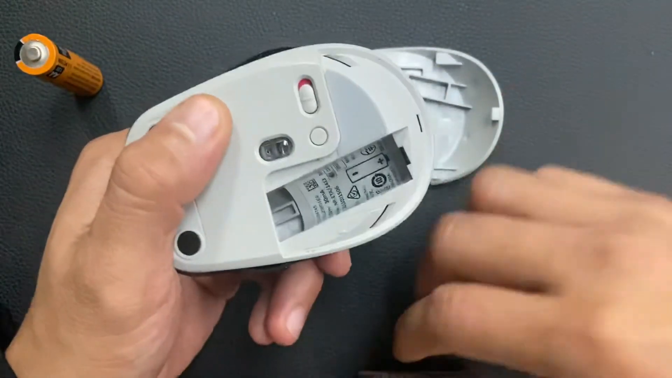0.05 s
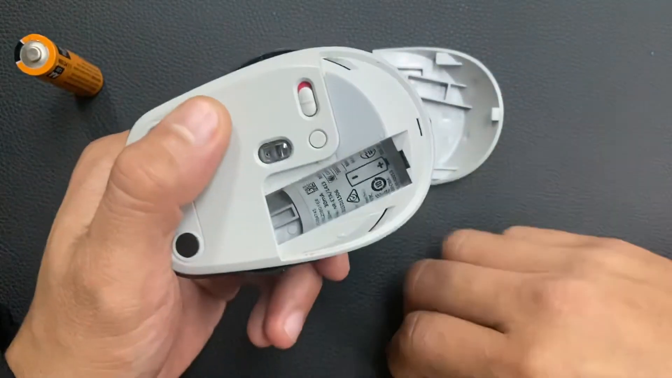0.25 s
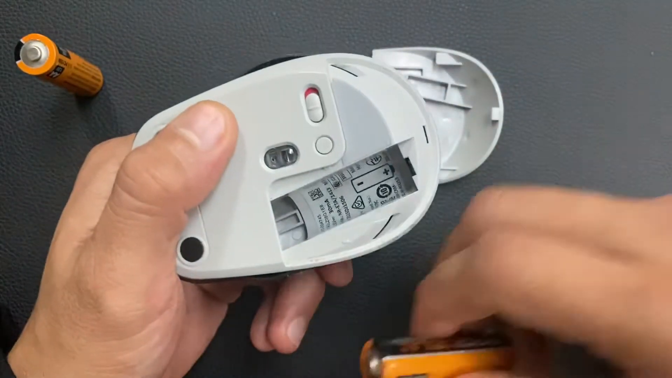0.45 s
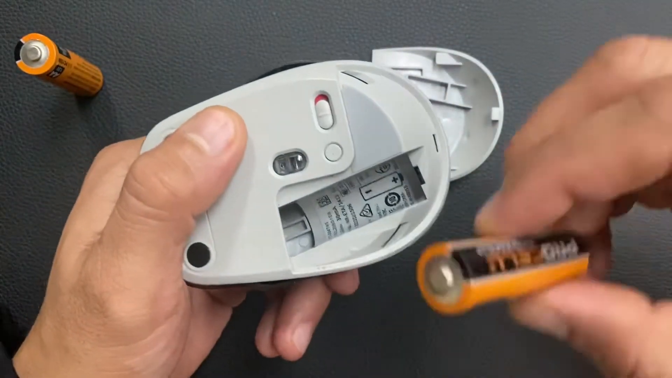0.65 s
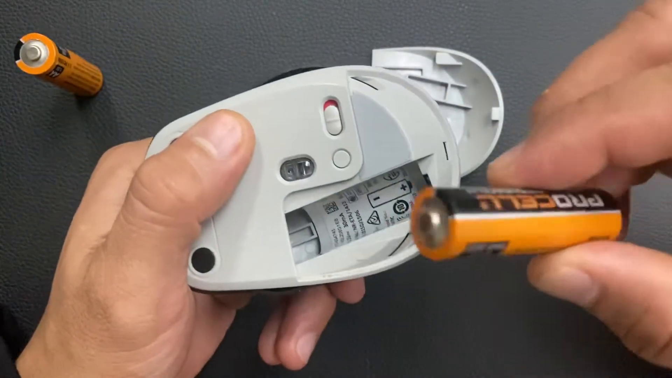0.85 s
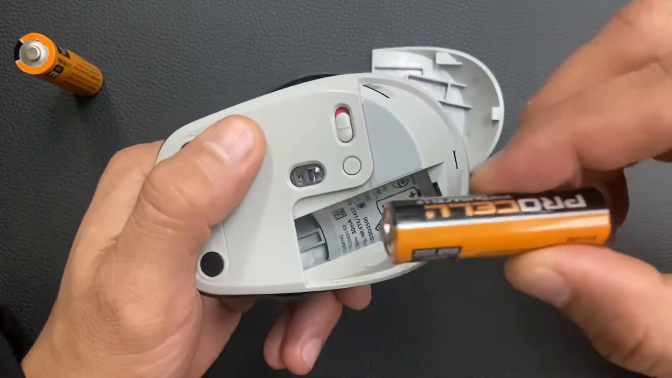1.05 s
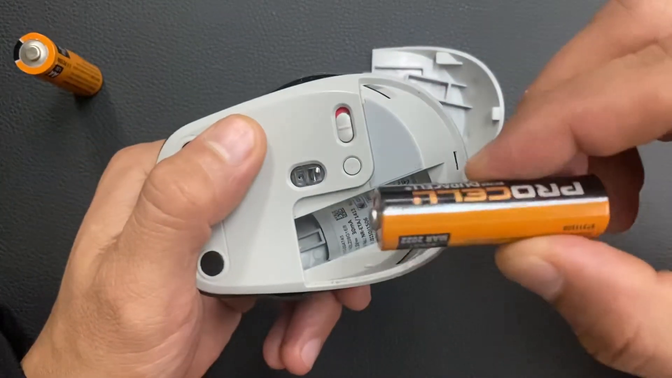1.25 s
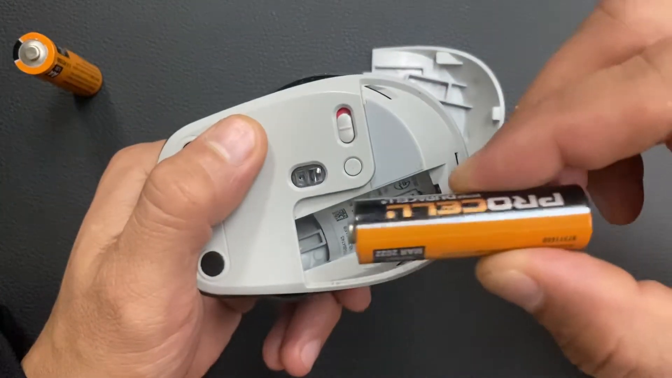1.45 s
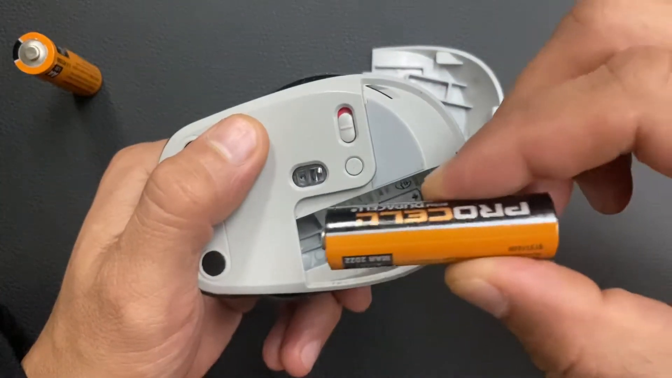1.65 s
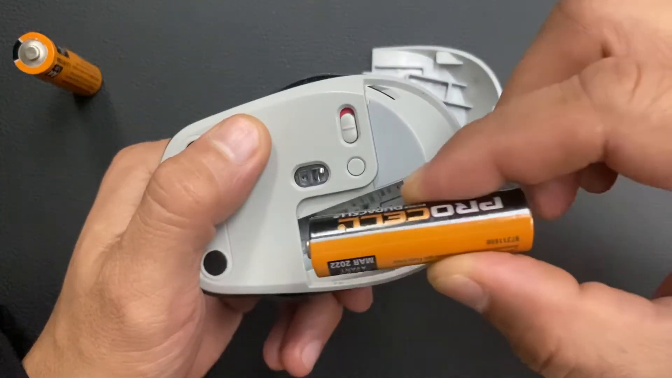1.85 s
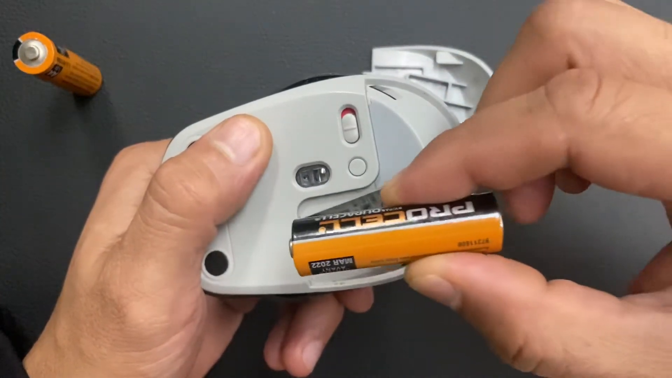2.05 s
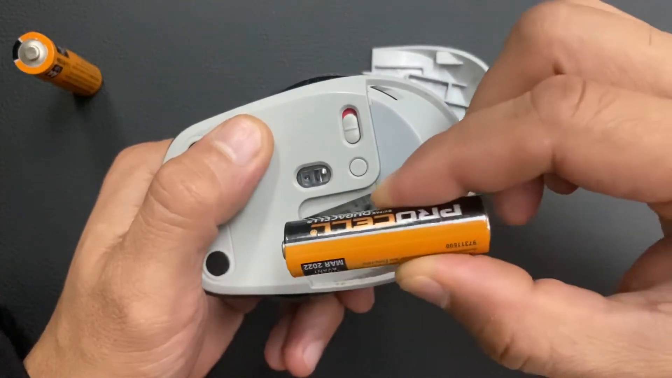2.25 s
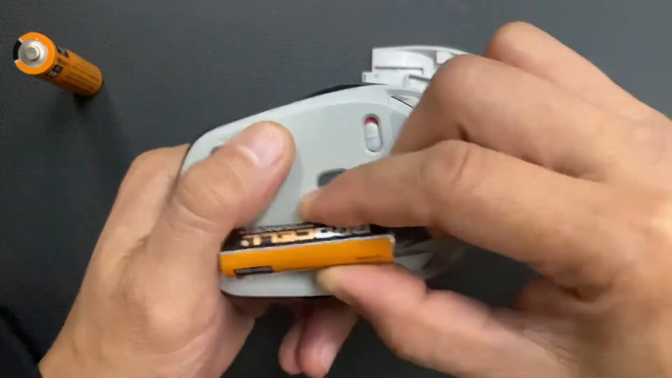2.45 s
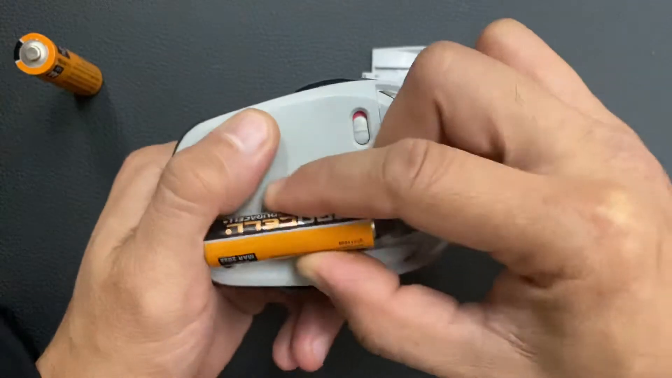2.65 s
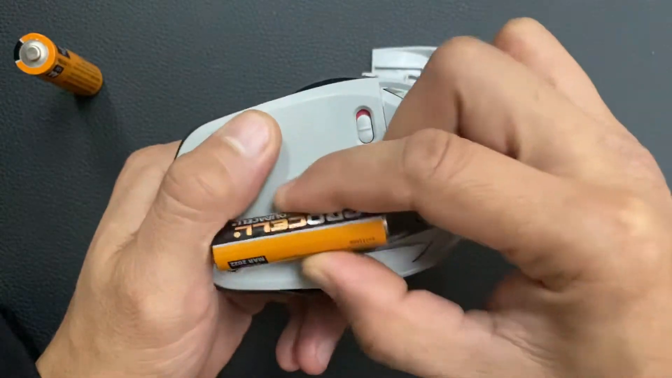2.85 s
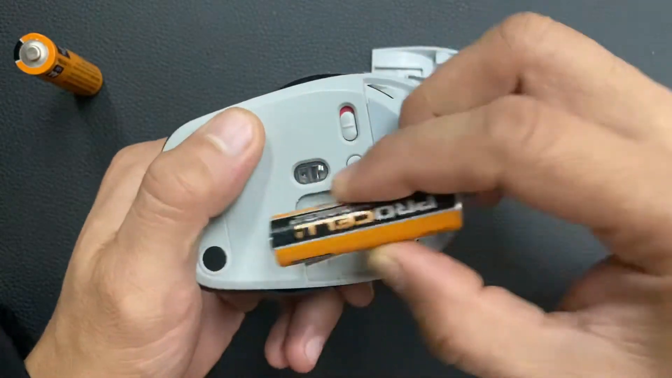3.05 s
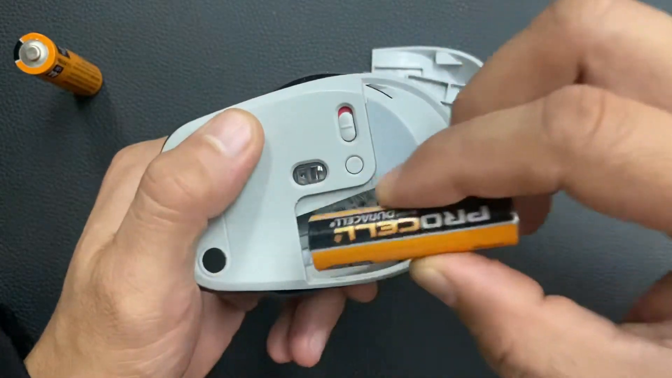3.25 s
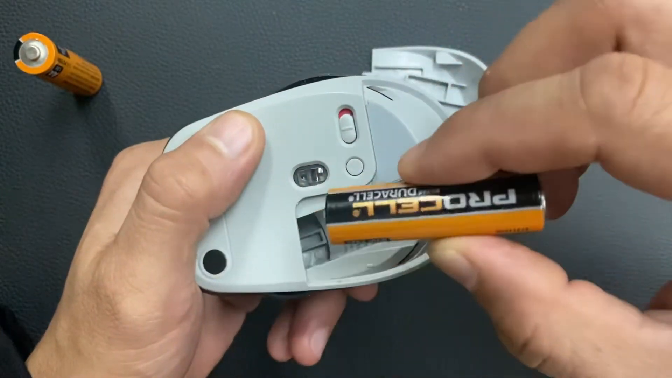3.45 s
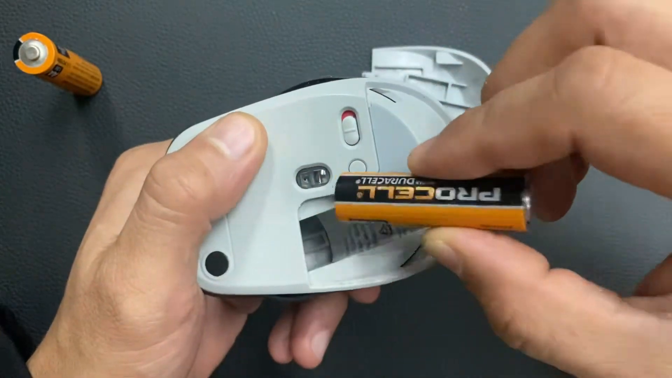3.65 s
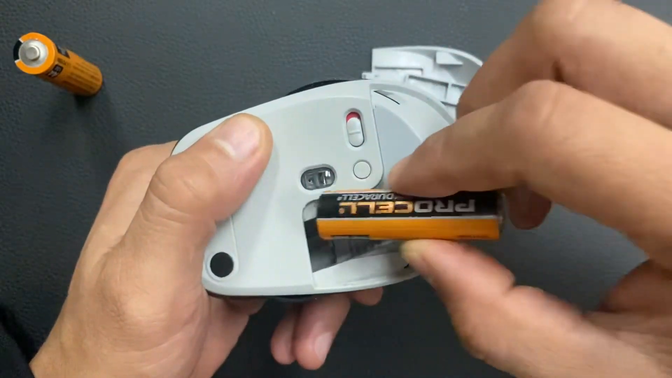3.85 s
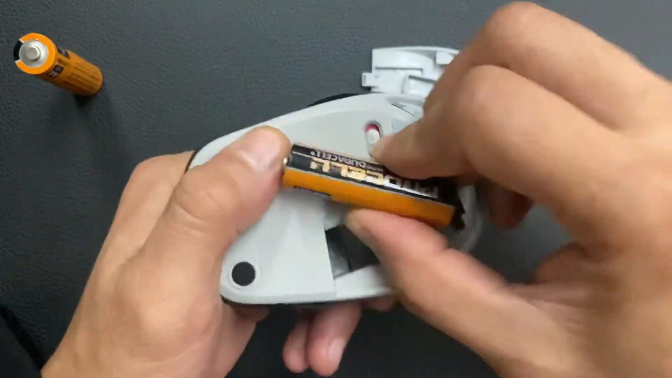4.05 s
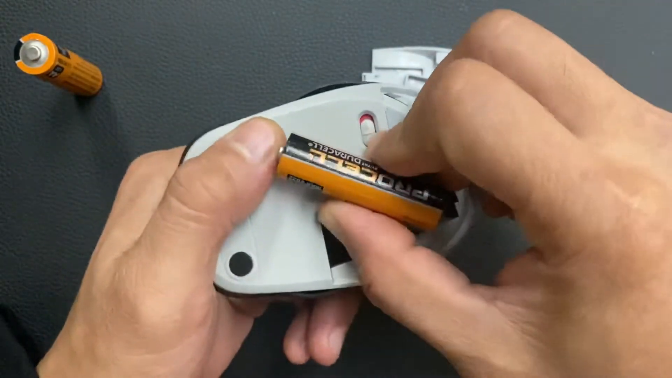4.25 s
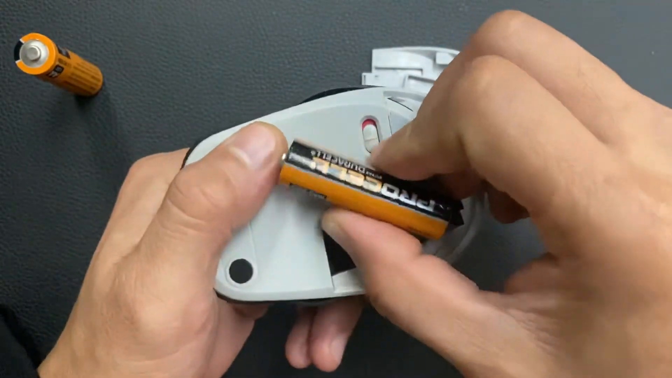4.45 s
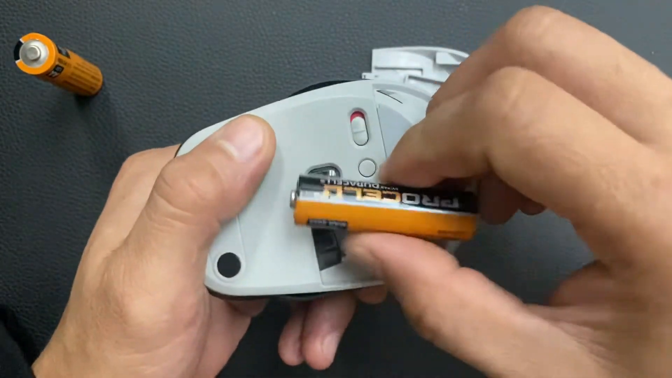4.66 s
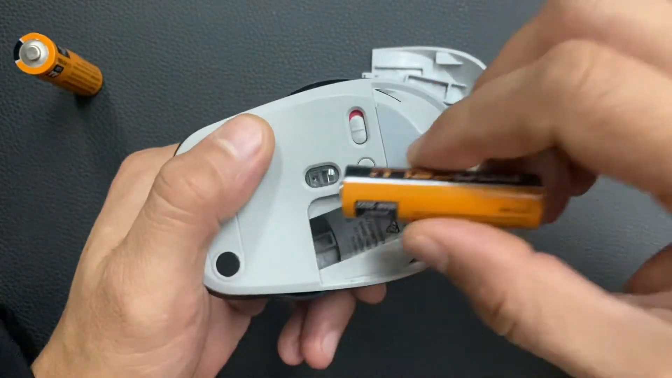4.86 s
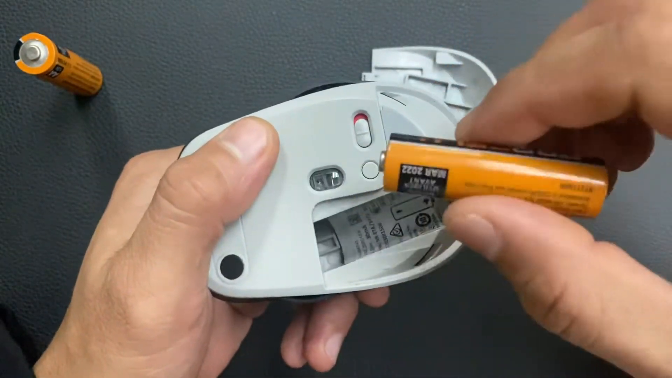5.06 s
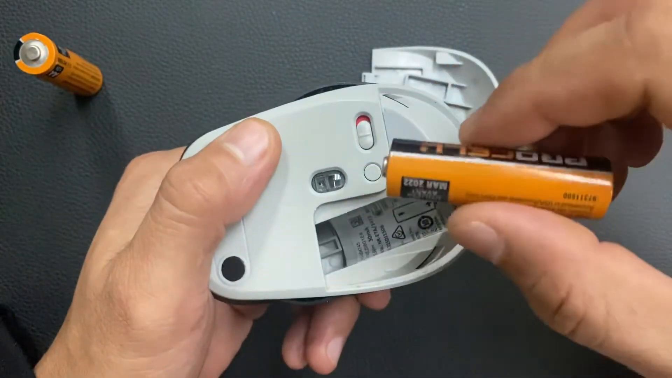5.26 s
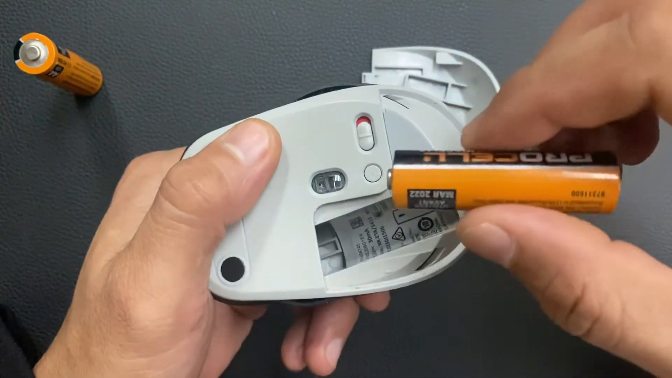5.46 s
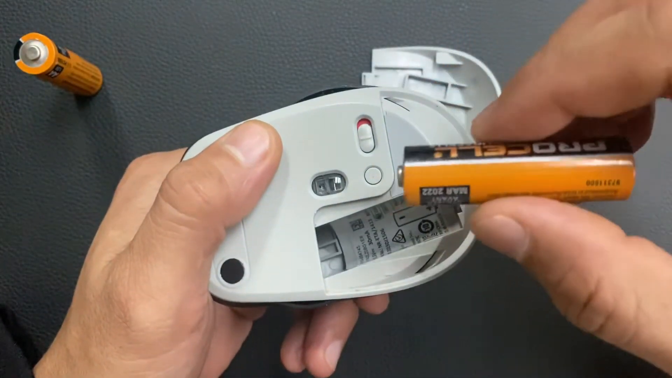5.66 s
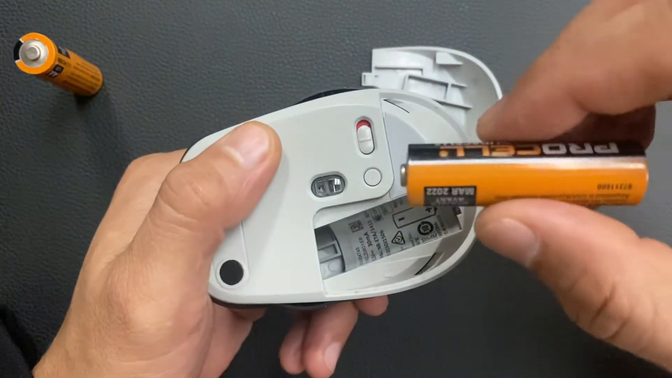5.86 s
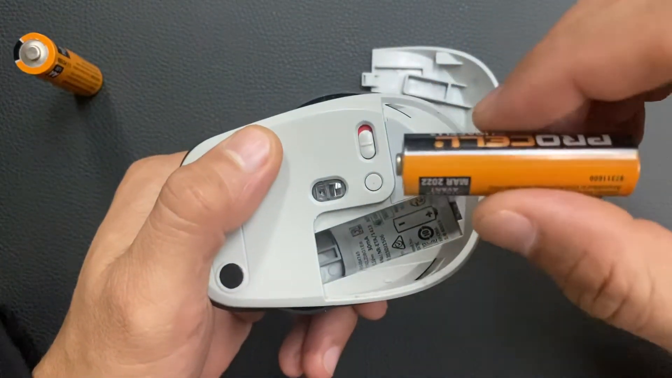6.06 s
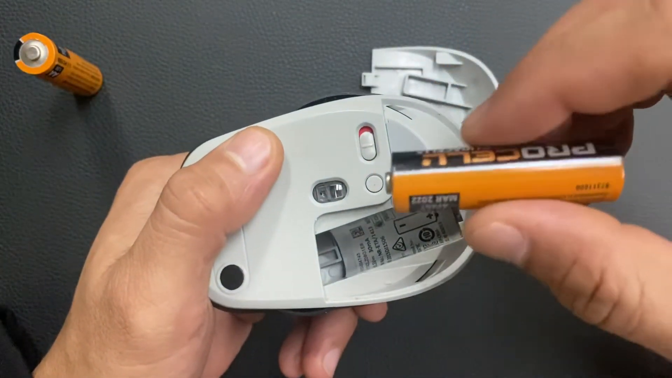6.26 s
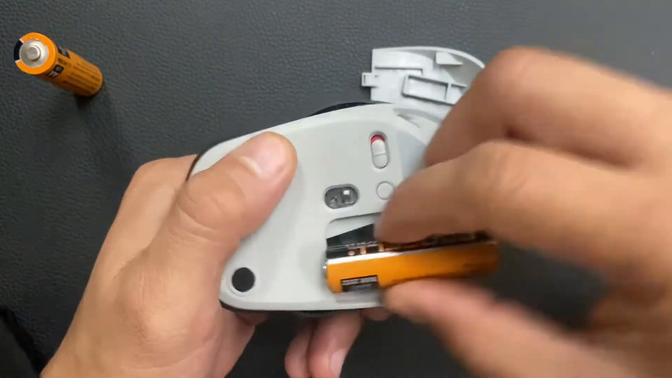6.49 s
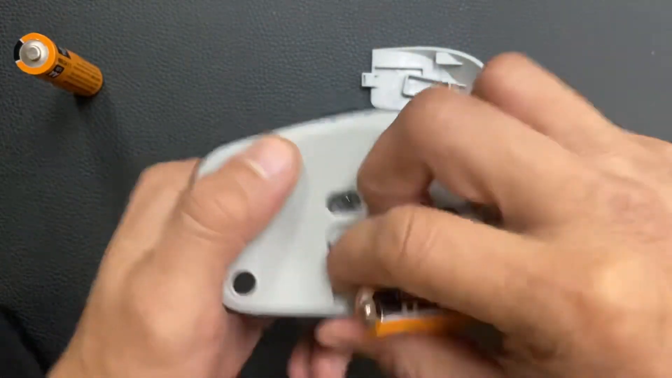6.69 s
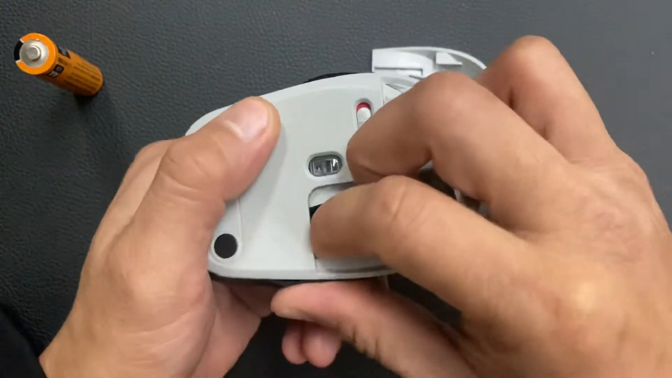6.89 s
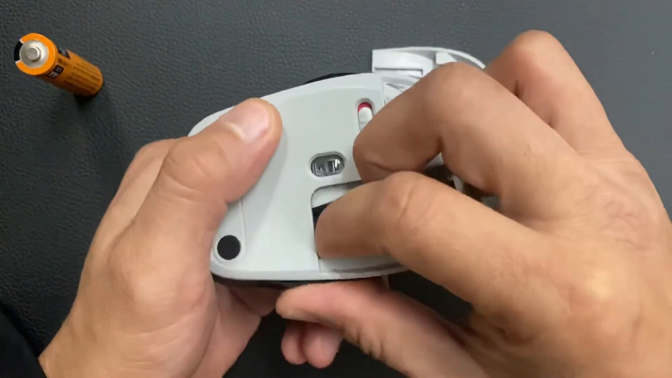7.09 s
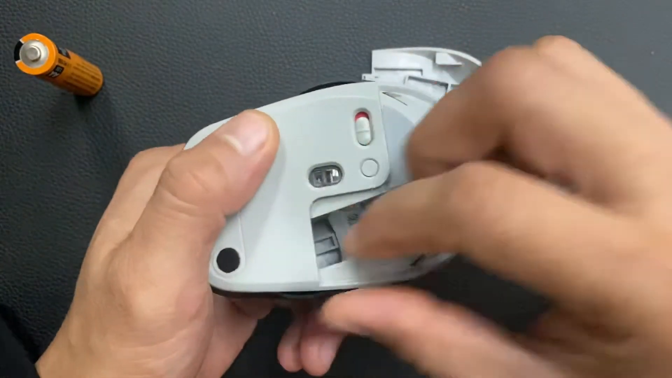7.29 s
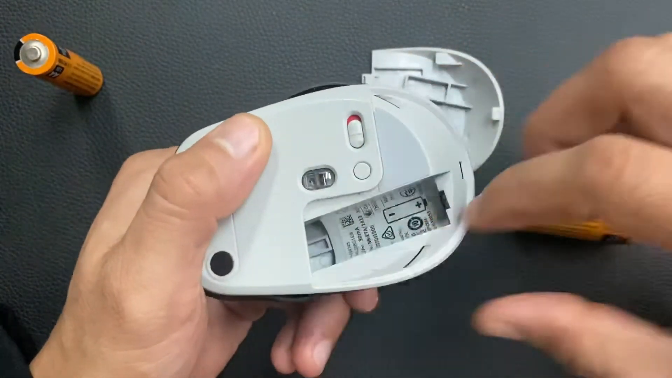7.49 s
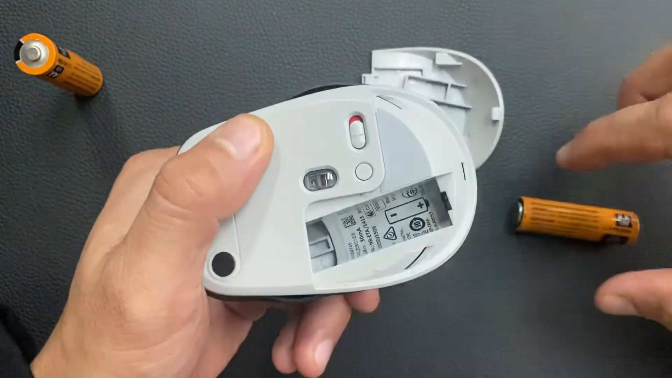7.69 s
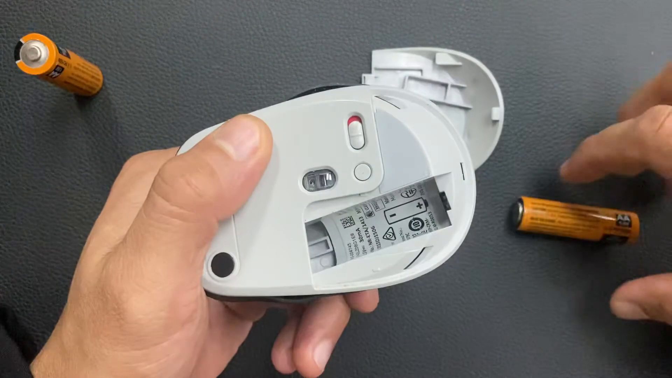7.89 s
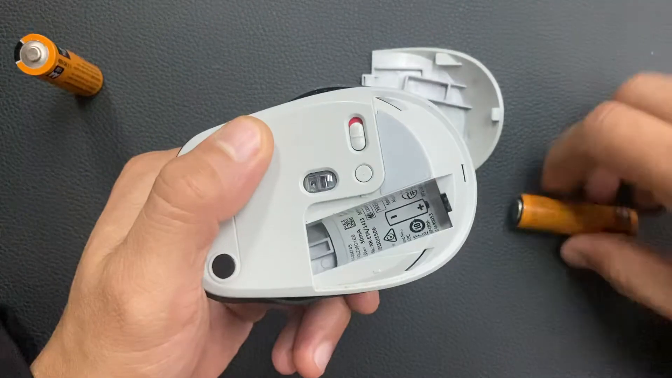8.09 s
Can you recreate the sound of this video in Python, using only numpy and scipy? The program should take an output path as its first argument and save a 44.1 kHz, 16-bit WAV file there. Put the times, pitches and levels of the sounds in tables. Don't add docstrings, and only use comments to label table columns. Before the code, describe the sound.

A small, fairly dry room with a constant low, slightly beating motor hum and soft ventilation air, heard by a close phone microphone. A faint rub starts it, and at 0.14 s a hand softly bumps the padded desk. Near-quiet until 2.35 s, when a steel battery snaps loudly against a thin plastic mouse shell, a bright double click with a short rasp. Faint ticks and scrapes follow at 2.6, 2.85 and 2.95. From 3.7 to 4.2 come a light tap, a hollow scrape and gentle finger rubbing, then mostly hum. At 6.44 the battery slips and rattles in a rapid, sharp clatter, with rasping until about 6.75. It drops at 6.9 with a heavy, full desk thud and again at 7.07 with a harder clack, each bouncing slightly and shuddering away. Soft finger rubs follow from 7.2 to 7.5; tiny ticks and dull touches end it around 8.0 to 8.1.

```python
import sys
import numpy as np
from scipy import signal
from scipy.fft import rfft, irfft
from scipy.io import wavfile
from scipy.ndimage import uniform_filter1d

SR = 44100
rng = np.random.default_rng(int(sys.argv[2]) if len(sys.argv) > 2 else 0)


def materialize(psi):
    bounded = np.clip(np.atleast_2d(psi).T, -1, 1)
    quanta = np.round(bounded * 32767).astype(np.int16)
    wavfile.write(sys.argv[1], SR, quanta)


def amplitude_ratio(level_db):
    exponent = np.asarray(level_db, float) / 20
    return 10 ** exponent


N = 358513
HZ = np.fft.rfftfreq(N, 1 / SR)
TIME = np.arange(N) / SR


def read(table, hz):
    f, value = np.transpose(table)
    return np.interp(np.log(hz + 1), np.log(f), value)


def shape(x, gain):
    return irfft(rfft(x) * gain, N)


def level(x, db, lo_hz=24.0, hi_hz=19630.0):
    inside = shape(x, (HZ > lo_hz) & (HZ < hi_hz))
    return x * amplitude_ratio(db) / np.sqrt(np.mean(inside ** 2))


def walk(rate_hz):
    hold = int(SR / rate_hz)
    steps = np.repeat(rng.standard_normal(N // hold + 1), hold)
    return 1.3 * uniform_filter1d(uniform_filter1d(steps, hold), hold)[:N]


def add(out, s, x):
    i = int(s * SR)
    out[i:i + len(x)] += x[:N - i]


def decay(t, t60):
    return np.exp(-np.log(1000) * t / t60)


def octave_band(hz):
    edges = [hz / np.sqrt(2), min(hz * np.sqrt(2), .45 * SR)]
    return signal.butter(2, edges, "band", fs=SR, output="sos")


def ring(modes, edges, band_db, push, scatter_db, crack, pitch=0.99):
    hz, db, t60 = np.transpose(modes)[:, :, None]
    t = np.arange(len(push)) / SR
    strength, detune = rng.standard_normal((2, len(modes), 1))
    tone = np.sin(2 * np.pi * hz * pitch * (1 + .02 * detune) * t)
    rings = amplitude_ratio(db + scatter_db * strength) * decay(t, t60) * tone
    rings[:, 0] = crack
    band = np.searchsorted(edges, hz[:, 0]) - 1
    out = 0
    for k, peak_db in enumerate(band_db):
        part = signal.fftconvolve(rings[band == k].sum(axis=0), push)[:len(t)]
        part = signal.sosfilt(signal.butter(2, edges[k:k + 2], "band", fs=SR, output="sos"), part)
        out = out + amplitude_ratio(peak_db) * part / np.abs(part).max()
    return out


# (f/Hz, level/dB, t60/s)
SHELL_MODES = [(950, -16, .012), (1500, 0, .016), (1950, -10, .007), (2550, -9, .006), (2900, 0, .007),
               (3390, 0, .007), (3850, -1, .006), (4300, -3, .006), (5100, 3, .005), (6200, -1, .004),
               (7250, -9, .004), (7900, -10, .004), (9400, -3, .003), (10200, 0, .003), (11300, -2, .003),
               (12200, -3, .003), (14500, -2, .003), (15500, -3, .003)]
SHELL_BANDS = (850, 2200, 4600, 8500, 17000)
# (f/Hz, level/dB, t60/s)
PALM_MODES = [(463, -3, 0.0066), (810, 0, .009)]
PALM_BAND = (300, 1100)


def contact(contact_ms, palm_db, s, mid_db, low_db, high_db, spot_hz):
    spot_boost_db, spot_octaves = 9.5, 0.16
    slip_s, slip_palm_db = 6.55, 7
    t, tau = np.arange(2048) / SR, contact_ms / 1000
    push = rng.standard_normal(len(t)) * (t / tau) ** 0.54 * np.exp(-t / tau)
    push[int(tau * SR)] = 0.83 / contact_ms
    tick_db = -5 + 1.25 * high_db
    modes = []
    for hz, db, t60 in SHELL_MODES:
        nearness = np.exp(-(np.log2(hz / spot_hz) / spot_octaves) ** 2)
        modes.append((hz, db + spot_boost_db * nearness, t60))
    bands_db = mid_db + np.array([low_db, 0, high_db, tick_db])
    rock_db = mid_db + low_db + palm_db + (s > slip_s) * slip_palm_db
    shell = ring(modes, SHELL_BANDS, bands_db, push, 2.0, 1.0)
    return shell + ring(PALM_MODES, PALM_BAND, [rock_db], push, 2.8, 0)


# (t/s, mid ring peak level/dB, hollow ring rel level/dB, high ring rel level/dB, loudest mode f/Hz)
TAPS = [(2.3466, -1, -12, -6.5, 3080), (2.3532, -13, -9, -9, 2830), (2.4046, -35, -1, -3.5, 2600),
        (2.9461, -51.5, 4.5, -6, 3170), (3.669, -34, -12, -13.5, 4076), (4.1724, -55, -6, -1, 2970),
        (8.0027, -45, -16, -21, 2570), (8.0159, -43.5, -21, -13, 2560), (8.0274, -46, -17, -7, 2937),
        (8.0692, -46.5, -26.5, -6.5, 3370), (8.0897, -54, -20, 1, 3220)]
# columns as the taps, t/s, 3 x level/dB, f/Hz
RATTLES = [(6.4433, -1, -22, -16.5, 3620), (6.4452, -10.5, -6.5, -5.5, 3490),
           (6.4544, -26.5, -18.5, -15.5, 3380), (6.4592, -15.5, -6, -17.5, 2760),
           (6.4654, -17, -12, -16.5, 2820), (6.4754, -12.5, -7.5, -3.5, 4150),
           (6.4852, -29.5, -9.5, -7.5, 2790), (6.5899, -33, -10.5, -13, 2800),
           (6.6045, -22, -12.5, -10, 3350), (6.6112, -30.5, -18, -14, 3770), (6.6204, -12, -16, -9.5, 4430),
           (6.6426, -41, -16.5, -11, 3950), (6.6491, -22.5, -8.5, -2, 3390),
           (6.6682, -40.5, -18, -19, 3150), (6.7168, -34.5, -2.5, -19, 3090),
           (6.751, -32.5, -2.5, -18, 3010)]
# columns as the taps, t/s, 3 x level/dB, f/Hz
SCRAPE_HITS = [
    (2.3634, -34, -6.5, -8, 2600),
    (2.584, -41, -20, 6, 4300),
    (2.8315, -40.5, -22, 10.5, 3020),
    (3.9424, -32, 0.5, -10, 3000),
    (6.4771, -14, -13.5, -11, 3510),
    (6.6019, -14.5, -8.5, -8, 3550),
]
# columns as the taps, t/s, 3 x level/dB, f/Hz
CAN_LANDINGS = [
    (0.1321, -41.5, -30, -5, 3720),
    (6.9043, -19, -31.5, -12.5, 2990),
    (7.065, -29.5, -27.5, 0.5, 2600),
]
# (f/Hz, width f/Hz, level/dB)
SHELL_GAPS = [(2310, 350, -5), (4650, 500, -6), (8700, 1500, -7.5)]


def clicks():
    out = np.zeros(N)
    kinds = ((TAPS, 0.45, -22), (RATTLES, .48, -8.5), (SCRAPE_HITS, 1.1, -9), (CAN_LANDINGS, 1.2, -np.inf))
    for table, contact_ms, palm_db in kinds:
        for event in table:
            add(out, event[0], contact(contact_ms, palm_db, *event))
    gaps_db = sum(db * np.exp(-(2 * (HZ - hz) / width) ** 2) for hz, width, db in SHELL_GAPS)
    return shape(out, amplitude_ratio(gaps_db))


# (t/s, body peak level/dB, boom rel level/dB, knock rel level/dB, clack rel level/dB)
DESK_BLOWS = [
    (0.141, -22.5, -11.5, -1, -36),
    (6.905, -0.17, -13, 0.1, -28),
    (6.955, -23, -12, -20, -24.5),
    (7.066, -2, -33, -2.5, -3.5),
    (7.1, -31, -16, -1.16, -6),
    (8.026, -40, 5.5, -21, -24.5),
    (8.084, -38, -15, -26, -29),
    (8.1, -38, 1.5, -29.5, -29.5),
]
# (f/Hz, level/dB, t60/s)
DESK_MODES = [(55.1, -7, 0.053), (89, -3.5, 0.14), (114, 2, 0.19), (232.8, -5.5, 0.041), (313, 3, 0.036),
              (399.4, -6.5, 0.046), (494.5, -18, 0.04074), (586, -14.5, 0.06), (911.7, 6.5, 0.013),
              (1010, 11.5, 0.01), (1297, -13, .006), (1693, -6, 0.0053), (2050, 8, 0.014),
              (2406, 5.5, 0.015), (3000, -19.5, 0.0073)]
DESK_BANDS = (35, 185, 700, 1500, 5000)
# (f/Hz, level/dB, t60/s)
SHUDDER_BANDS = [(97, -31.5, 0.4), (201.2, -23, 0.26), (387, -26.5, 0.21), (790, -24, 0.21),
                 (1636, -36.5, 0.11), (3225, -50, 0.21), (6430, -65.5, 0.1091), (12000, -80, 0.077)]


def thuds():
    bend_ms = 1.8
    deep_db_per_oct, even_boom_db = 1.3, -23
    even_clack_db = -14
    out, push = np.zeros(N), np.zeros(16384)
    push[:13] = -np.hanning(13)
    t, hz = np.arange(len(push)) / SR, np.fft.rfftfreq(len(push), 1 / SR)
    late_s = bend_ms / 1000 * np.sqrt(1000 / np.clip(hz, 60, 1100))
    slow = np.exp(-2j * np.pi * np.cumsum(late_s) * hz[1])
    for s, db, boom_db, knock_db, clack_db in DESK_BLOWS:
        tilt = -deep_db_per_oct * np.clip(boom_db - even_boom_db, -8, 8)
        modes = [(f, mode_db + tilt * np.log2(np.clip(f, 220, 420) / 300), t60)
                 for f, mode_db, t60 in DESK_MODES]
        bands_db = db + np.array([boom_db, 0, knock_db, clack_db])
        blow = irfft(rfft(ring(modes, DESK_BANDS, bands_db, push, 0.9, 0, pitch=1.01)) * slow)
        for f, tail_db, t60 in SHUDDER_BANDS:
            noise = signal.sosfilt(octave_band(f), rng.standard_normal(len(t)))
            if f < DESK_BANDS[1]:
                tail_db += .4 * (boom_db - even_boom_db)
            if f > DESK_BANDS[3]:
                tail_db += .25 * (clack_db - even_clack_db)
            fade = decay(t, t60) * (1 - np.exp(-t / 0.0016))
            blow += amplitude_ratio(db + tail_db) * noise / noise.std() * fade
        add(out, s - .0002, blow)
    return out


# (t/s, rasp level/dB, 30 dB fall t/s, hiss rel level/dB)
SLIDES = [(0.0, -65.5, 0.38, -19), (.17, -75, 0.1433, 4.5), (2.356, -43.5, 0.0937, -7.5),
          (2.6, -66, .22, -8), (2.84, -70, 0.06, 5), (3.812, -62.5, 0.25, -22), (3.945, -54, 0.18, -9.5),
          (6.49, -50, 0.12, -1), (6.752, -48, 0.04, -17), (6.762, -68.5, 0.6, -5.5)]
# (middle t/s, length t/s, rasp level/dB, hiss rel level/dB)
FINGER_STROKES = [(2.381, 0.07, -53, -8), (3.03, 0.093, -76, -12), (3.862, 0.057, -70, -24),
                  (3.931, .05, -60, -14), (4.144, 0.086, -65, -11.5), (4.48, .11, -75.5, -16.5),
                  (6.577, 0.076, -66.5, -11.5), (6.608, 0.03, -35, -6.5), (6.649, 0.0183, -53, -6.5),
                  (6.696, .11, -63, -9), (7.23, 0.057, -57.5, -7), (7.34, 0.2, -76, -10),
                  (7.48, 0.15, -70.5, -1), (8.08, 0.1, -69, -1)]
# (f/Hz, width f/Hz, level/dB)
RASP_PEAKS = [(1619.4, 350, -4), (2180, 600, -11), (3100, 420, 0.5), (3700, 700, -3.5)]


def rubs():
    attack_s = .008
    stroke_edge = 2.6
    hiss_edge_hz, hiss_tilt_db_per_oct = 4700, -5
    snags_db = 3 * rng.exponential(size=N) * (rng.random(N) < .05)
    slips = rng.standard_normal(N) * amplitude_ratio(snags_db + 1.8 * walk(120))
    rasp_power = sum(amplitude_ratio(2 * db) / (1 + (2 * (HZ - hz) / width) ** 4) for hz, width, db in RASP_PEAKS)
    rasp = level(shape(slips, np.sqrt(rasp_power)), 0)
    body = np.sqrt(sum(amplitude_ratio(2 * db) / (1 + ((HZ - hz) / (hz / 12)) ** 2) for hz, db, _ in SHELL_MODES))
    tilt = amplitude_ratio(hiss_tilt_db_per_oct * np.log2((HZ + 1) / hiss_edge_hz))
    high = tilt / (1 + (hiss_edge_hz / (HZ + 1)) ** 6)
    hiss = level(shape(slips, body * high), 0)
    rasp_pressure, hiss_pressure = np.zeros(N), np.zeros(N)
    for s, db, fall_s, hiss_db in SLIDES:
        rise = np.clip((TIME - s) / attack_s + 1, 0, 1)
        press = rise * amplitude_ratio(db - 30 * np.clip(TIME - s, 0, None) / fall_s)
        rasp_pressure += press
        hiss_pressure += press * amplitude_ratio(hiss_db + 1.0)
    for s, length_s, db, hiss_db in FINGER_STROKES:
        press = amplitude_ratio(db) * np.exp(-np.abs(2 * (TIME - s) / length_s) ** stroke_edge)
        rasp_pressure += press
        hiss_pressure += press * amplitude_ratio(hiss_db + 1.0)
    return rasp * rasp_pressure + hiss * hiss_pressure


# (f/Hz, t60/s)
REVERB_TIME = [(100, 0.24), (400, 0.4), (1500, .33), (5000, 0.18), (14000, 0.06)]
# (f/Hz, level/dB)
DIFFUSE_SIDE = [(60, 0.5), (110, -13), (200, -10), (380, -3), (700, 2.5), (1290, 1), (2380, -22),
                (4400, -13.5), (8120, -12), (15000, 5)]


def room(x):
    room_db, delay_s = -23, 0.0013
    t = np.arange(SR // 2) / SR
    tails = np.zeros((2, len(t)))
    for hz in 60 * 2. ** np.arange(9):
        noise = signal.sosfilt(octave_band(hz), rng.standard_normal(tails.shape))
        tails += noise * decay(t, read(REVERB_TIME, hz))
    tails *= 1 - np.exp(-(t / delay_s) ** 2)
    tails /= np.sqrt(np.sum(tails[0] ** 2))
    mid, side = signal.fftconvolve(x[None], tails, axes=1)[:, :N] * amplitude_ratio(room_db)
    return mid, shape(side, amplitude_ratio(read(DIFFUSE_SIDE, HZ)))


MOTOR_HZ = (57.45, 58.38, 114.9, 116.76, 119.75, 172.35, 177.2, 229.8, 233.5, 239.5, 1492)
MOTOR_DB = (-56, -57.5, -57, -71.5, -58.5, -72, -65.5, -73.5, -71.5, -65, -82)


def hum():
    in_step_s = .65
    mid = np.zeros(N)
    for hz, db in zip(MOTOR_HZ, MOTOR_DB):
        swell = amplitude_ratio(db + 0.77 * walk(1.9)) * np.sqrt(2)
        mid += swell * np.cos(2 * np.pi * hz * (TIME - in_step_s))
    return mid, shape(mid, amplitude_ratio(read(DIFFUSE_SIDE, HZ) - 7.5) * np.exp(1.75j))


# (f/Hz, level/dB per Hz)
AIR_COLOUR = [(22, -22), (45, -6), (70, 2), (200, -1.5), (320, -6.5), (500, -12), (750, -12.5),
              (1050, -25.5), (1600, -28), (3900, -35), (4800, -39.5), (7800, -46), (8500, -51.5),
              (16000, -61)]
# (f/Hz, width f/Hz, level/dB)
DUCT_PEAKS = [(81, 9, 0.5), (185, 7.6, 6), (285.8, 47, 1.5), (2073, 67, 4.5), (3370, 76, 11),
              (3689, 54, 11.5)]


def air():
    ducts_db = sum(db / (1 + (2 * (HZ - hz) / width) ** 2) for hz, width, db in DUCT_PEAKS)
    colour = amplitude_ratio(read(AIR_COLOUR, HZ) + ducts_db)
    ports = np.array([HZ > 0, amplitude_ratio(read(DIFFUSE_SIDE, HZ))])
    spectra = rfft(rng.standard_normal((2, N))) * colour * ports
    octave, out = np.log2(HZ / 40 + 1e-3), np.zeros((2, N))
    for k in range(10):
        band = np.clip(1 - abs(octave - k), 0, 1)
        out += irfft(spectra * band, N) * amplitude_ratio(.8 * walk(4.1))
    return out * level(out[0], -58.5, 260., 1200.0).std() / out[0].std()


# (f/Hz, level/dB)
DESK_SIDE = [(60, -14), (110, -13), (200, -16), (380, -15), (700, -6), (1290, -14), (2380, -15),
             (4400, -12), (8120, -8.5), (15000, 3)]
# (f/Hz, level/dB)
DESK_LEFT = [(60, -1.5), (110, -0.5), (200, -1.5), (380, -1.5), (700, 0.705), (1290, 0.97), (2380, -0.13),
             (4400, 0.38), (8120, 0.0), (15000, -0.18)]


def scene():
    light, heavy = clicks() + rubs(), thuds()
    near = light + heavy
    lean = np.tanh(read(DESK_LEFT, HZ) * np.log(10) / 40)
    lag = np.sqrt(np.clip(amplitude_ratio(2 * read(DESK_SIDE, HZ)) - lean ** 2, 0, None))
    direct = np.array([near, shape(near, lean + 1j * lag)])
    mid, side = direct + room(light + amplitude_ratio(-3) * heavy) + hum() + air()
    return np.array([mid + side, mid - side])


def roll_off(x):
    return signal.sosfilt(signal.butter(12, 16970, fs=SR, output="sos"), x)


# (f/Hz, level/dB)
MIC_RESPONSE = [(15, -6), (45, 0), (70, 0.5), (12200, -1), (12600, -14.5), (13500, -20.5), (14000, 0),
                (15900, -2.5), (16200, -40)]


def record(dry):
    limit = .93
    heard = shape(dry, amplitude_ratio(read(MIC_RESPONSE, HZ)))
    rounded = heard / (1 + np.abs(heard / limit) ** 8) ** .125
    return roll_off(rounded)


dry = scene()
out = record(dry)
materialize(out)
```